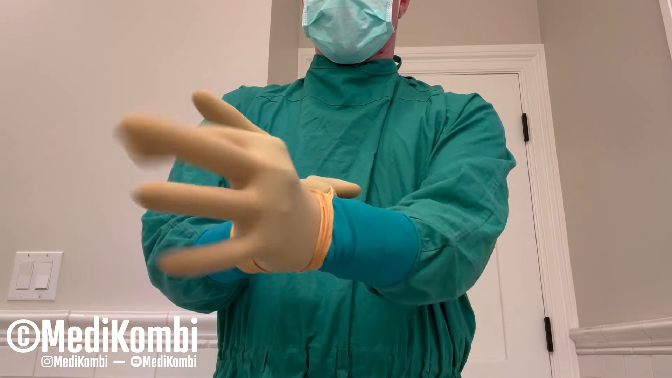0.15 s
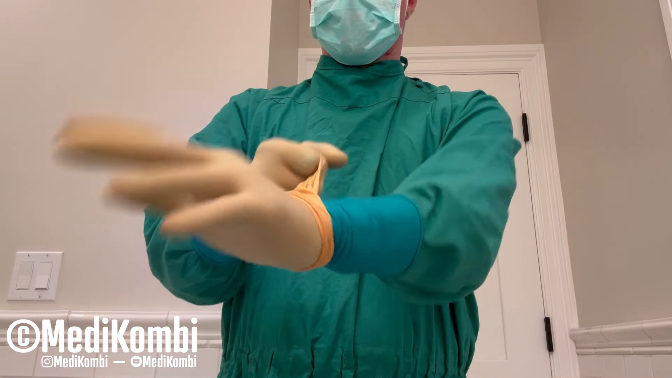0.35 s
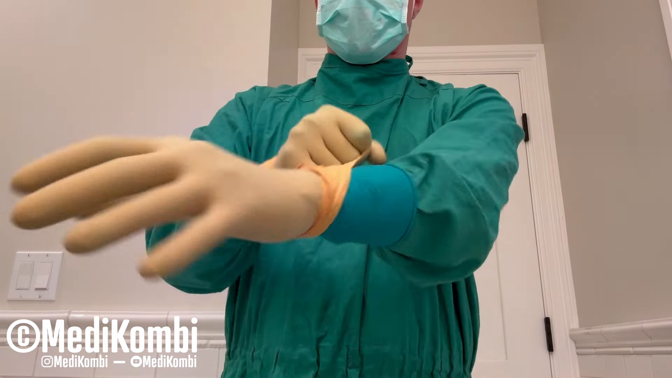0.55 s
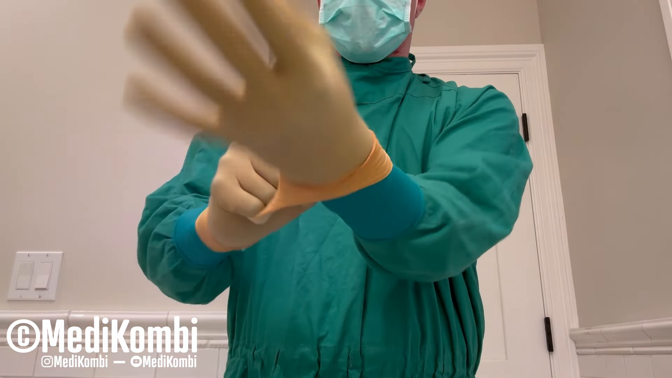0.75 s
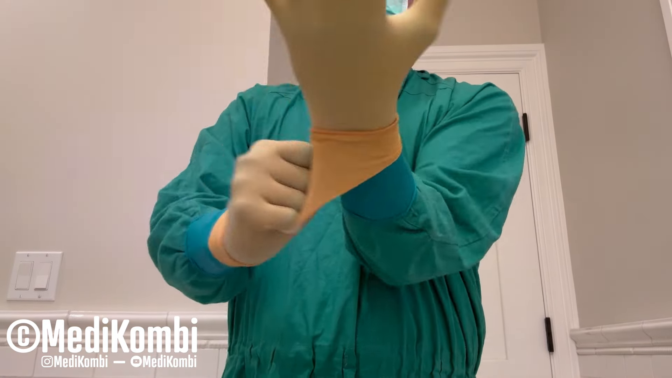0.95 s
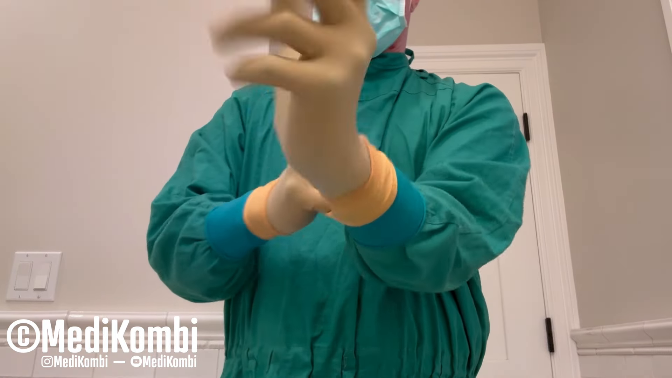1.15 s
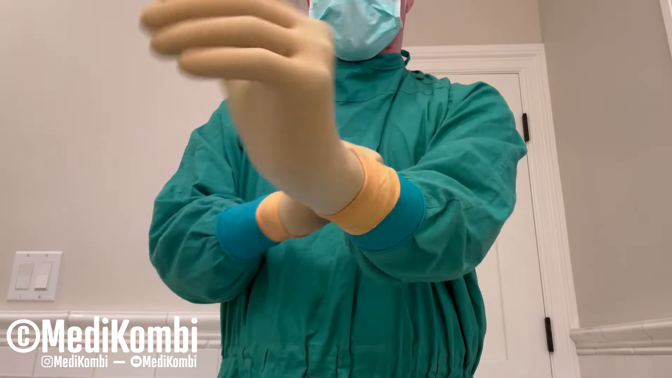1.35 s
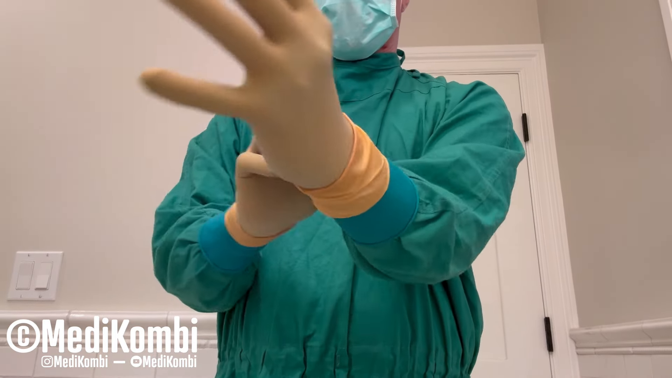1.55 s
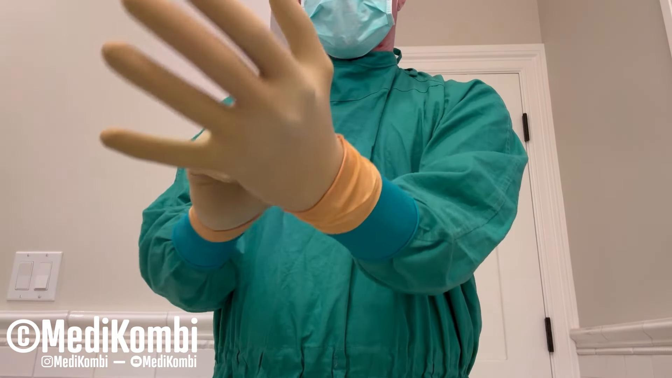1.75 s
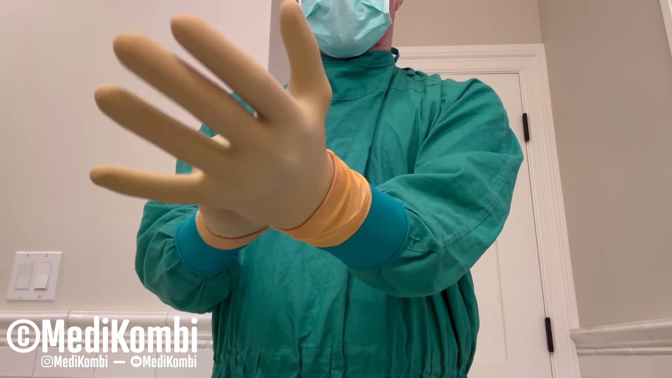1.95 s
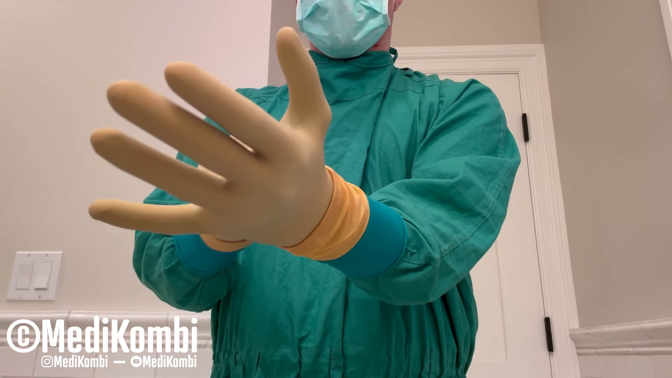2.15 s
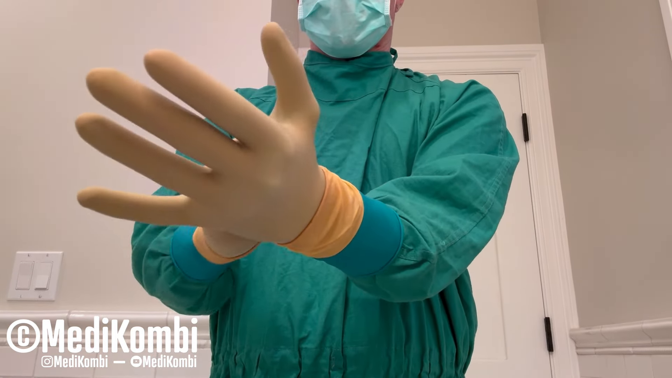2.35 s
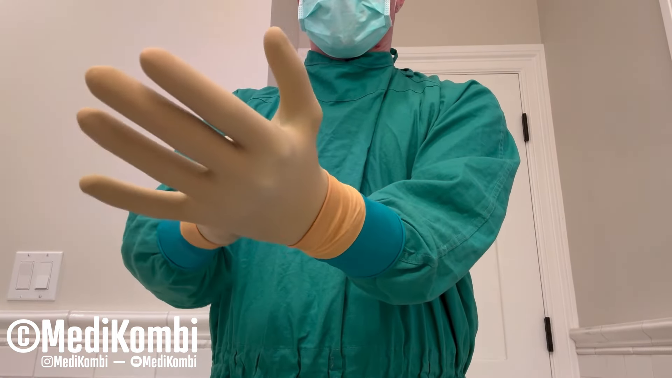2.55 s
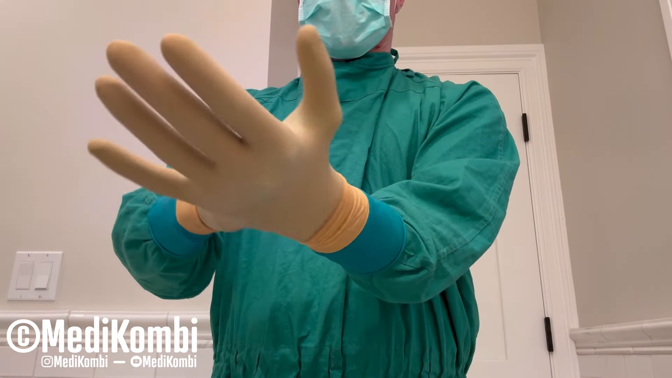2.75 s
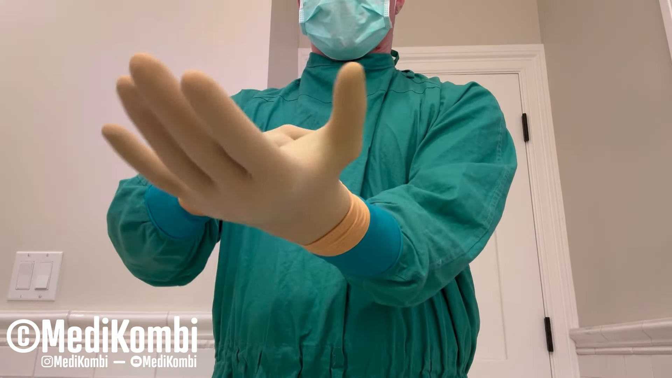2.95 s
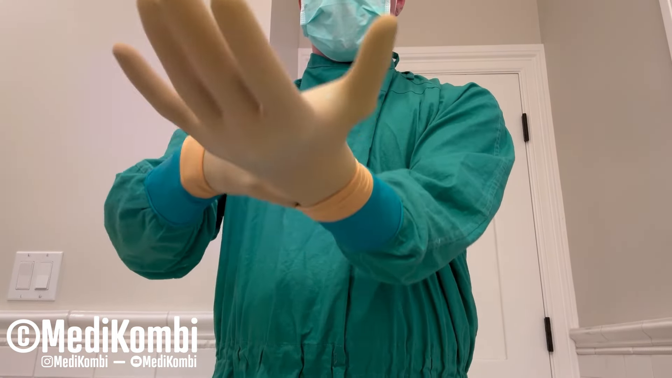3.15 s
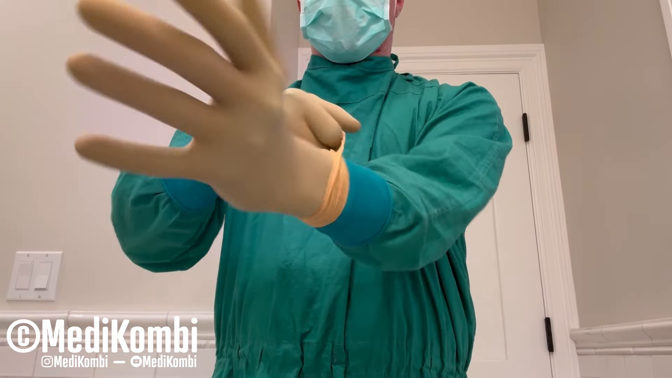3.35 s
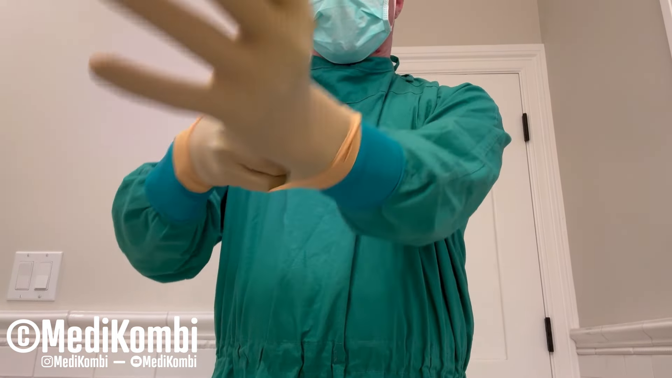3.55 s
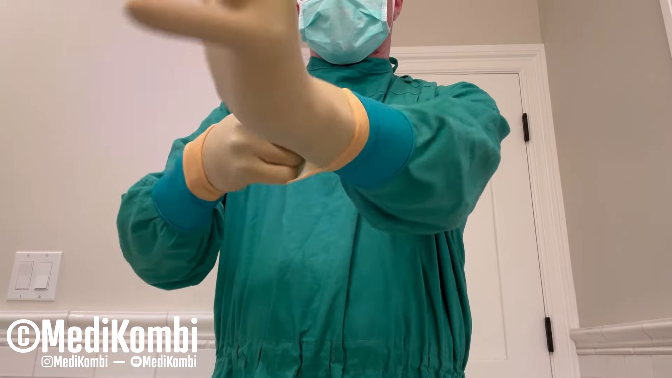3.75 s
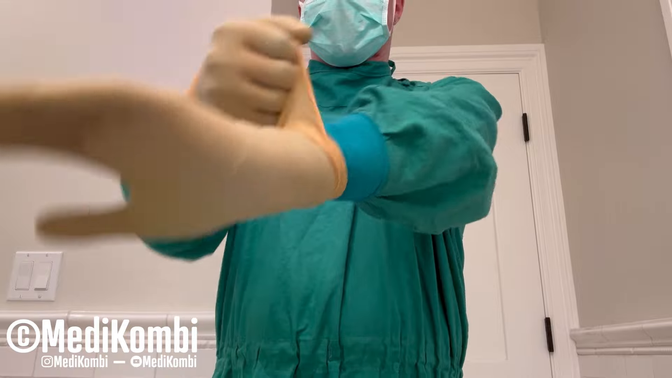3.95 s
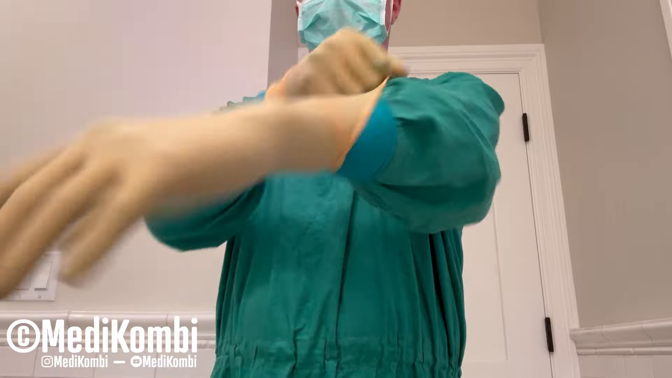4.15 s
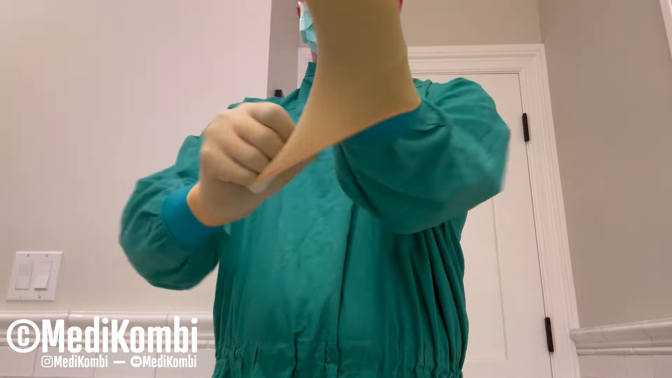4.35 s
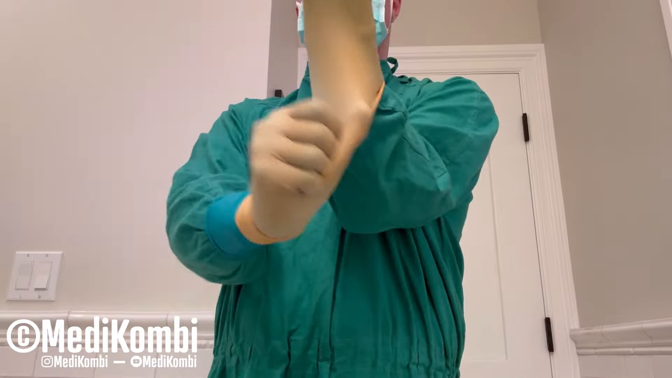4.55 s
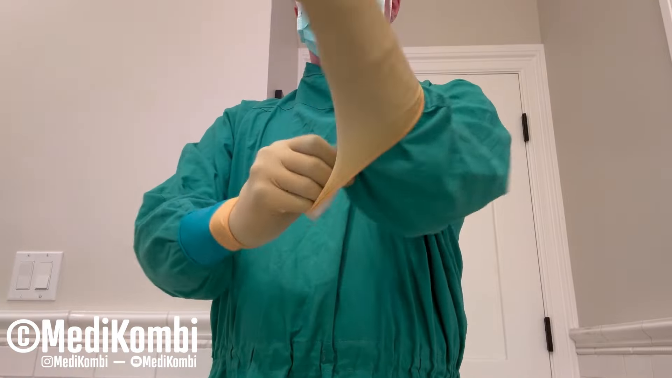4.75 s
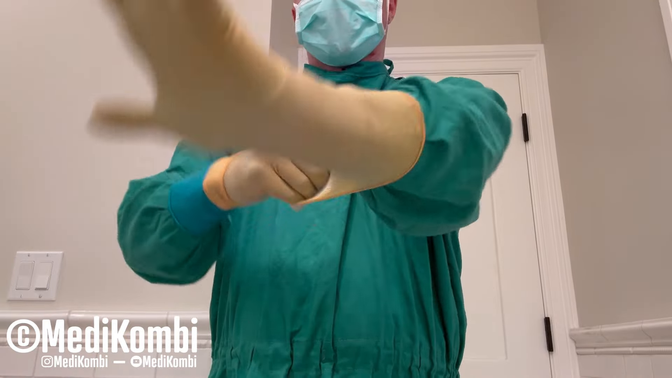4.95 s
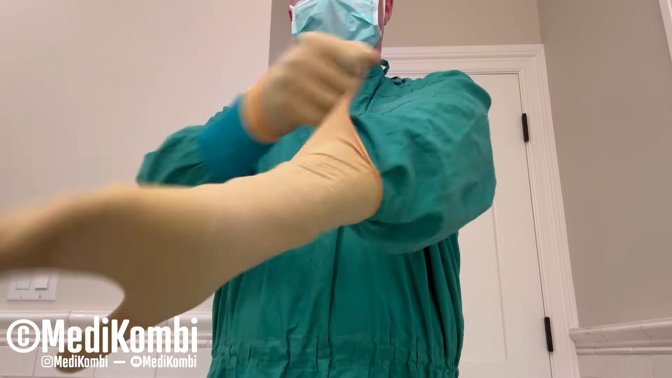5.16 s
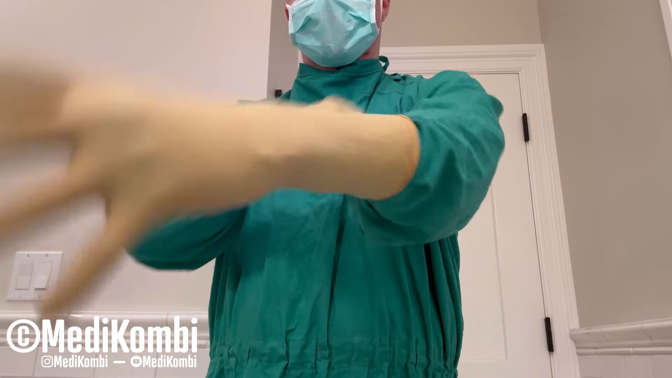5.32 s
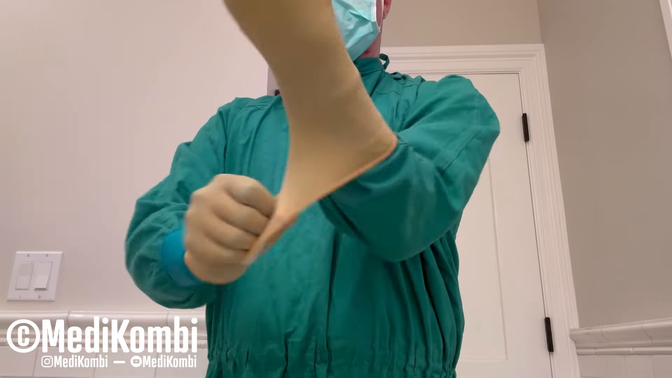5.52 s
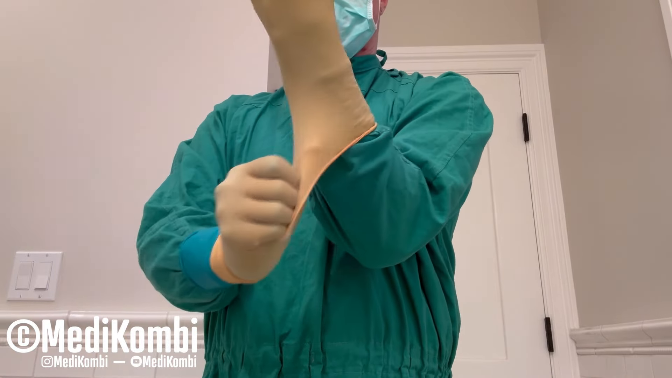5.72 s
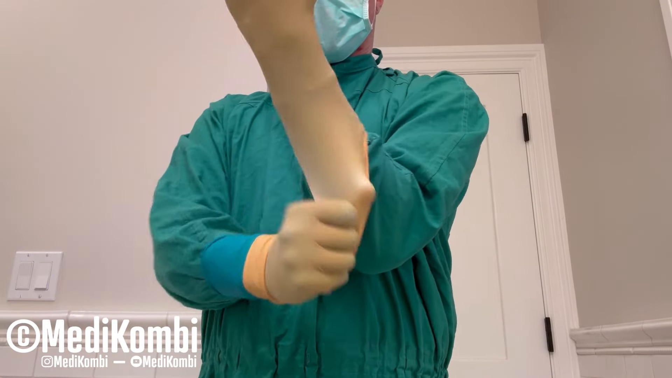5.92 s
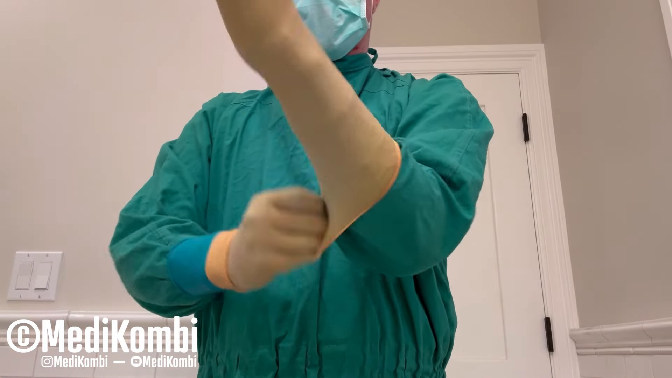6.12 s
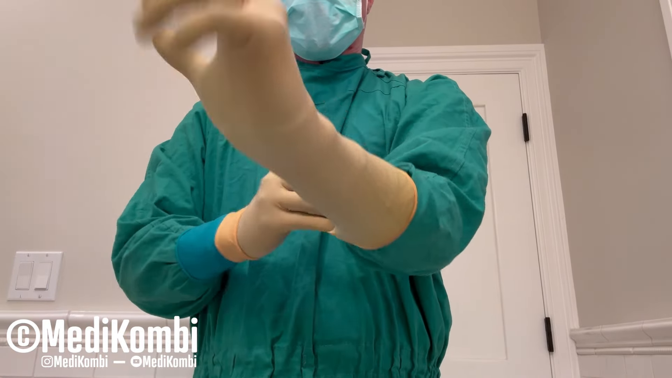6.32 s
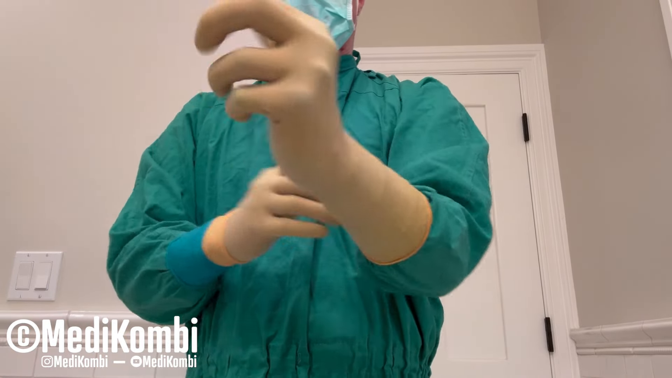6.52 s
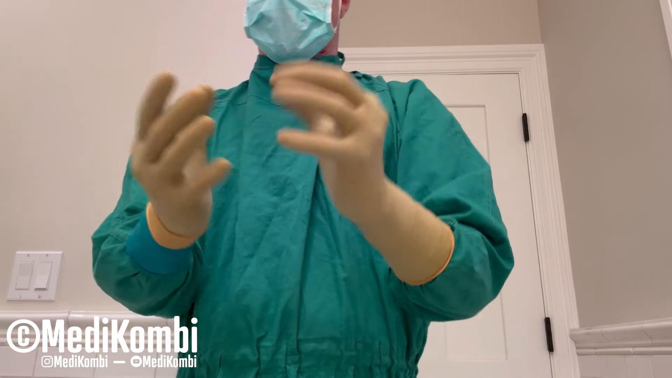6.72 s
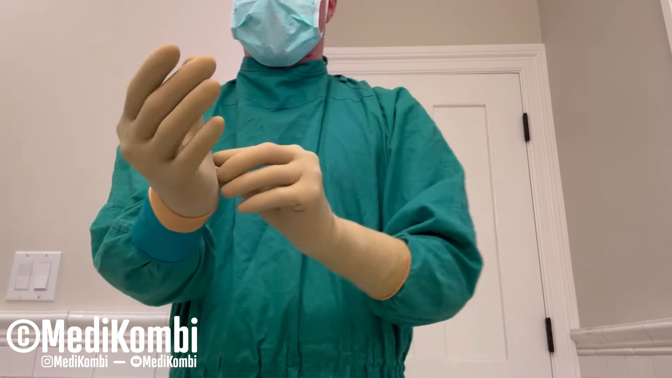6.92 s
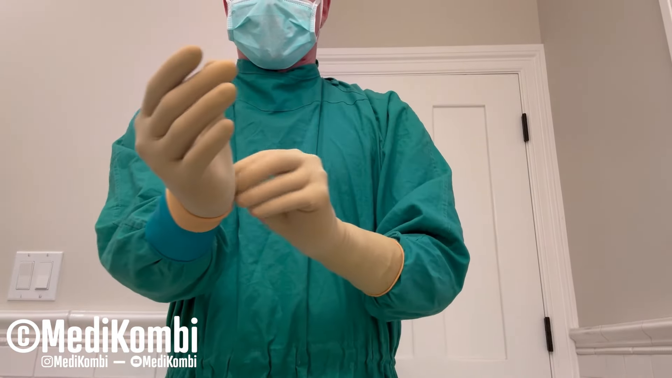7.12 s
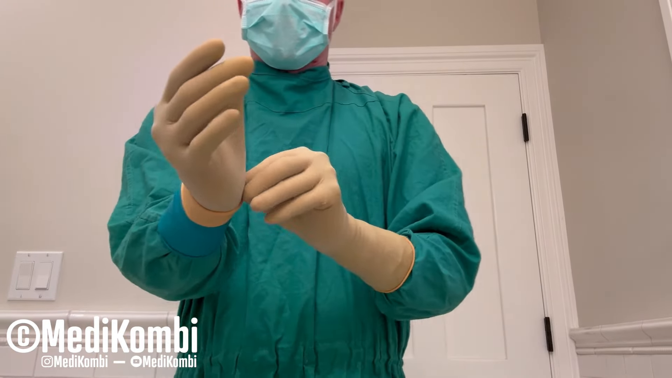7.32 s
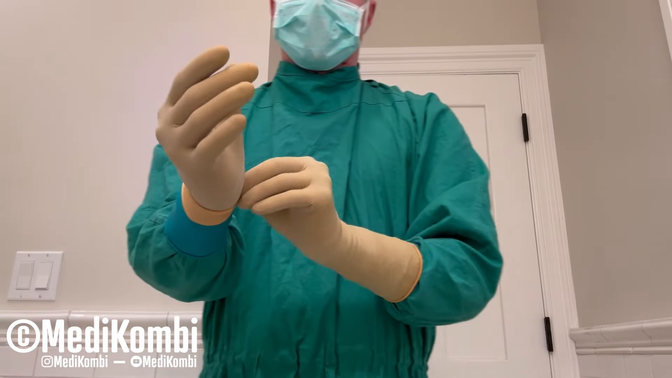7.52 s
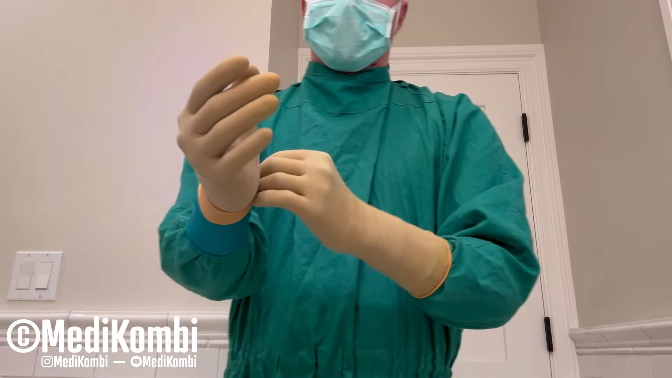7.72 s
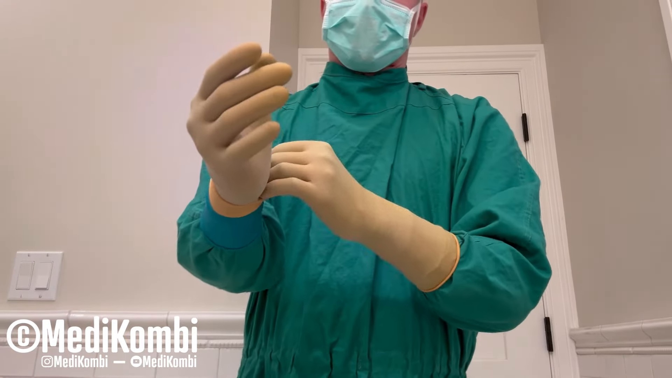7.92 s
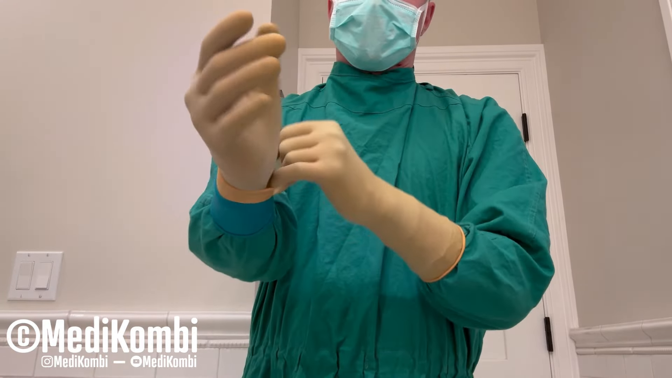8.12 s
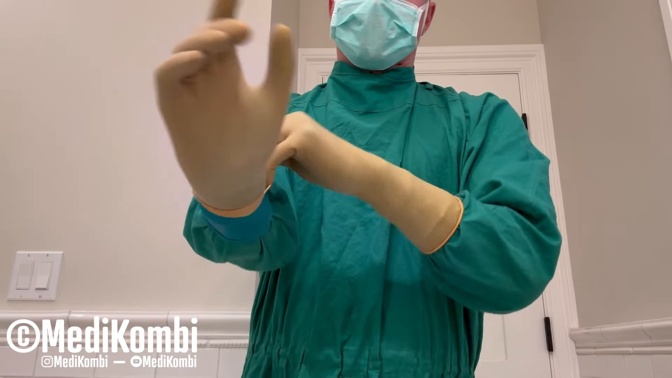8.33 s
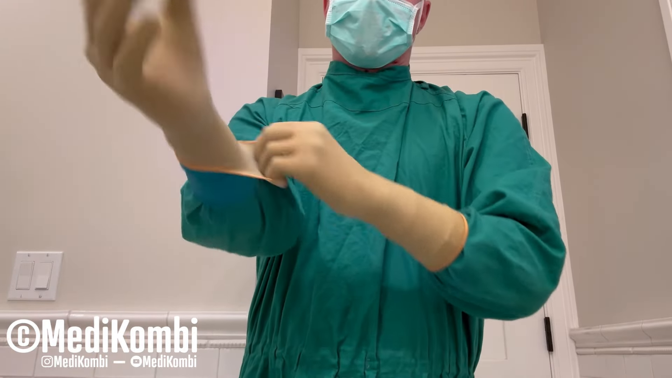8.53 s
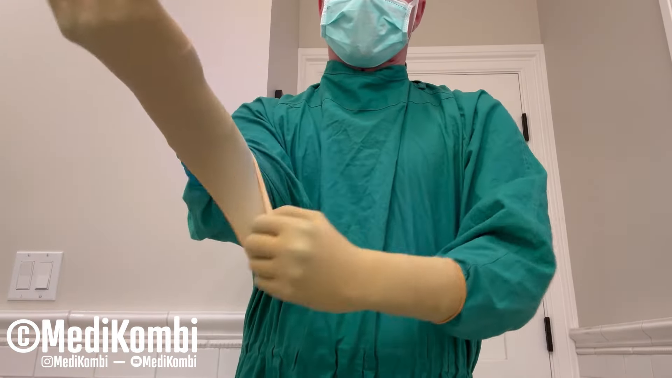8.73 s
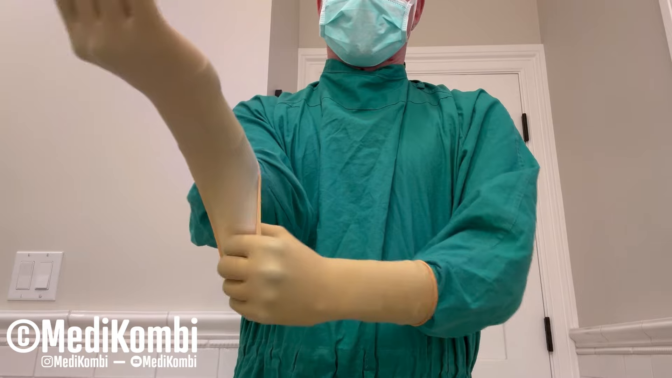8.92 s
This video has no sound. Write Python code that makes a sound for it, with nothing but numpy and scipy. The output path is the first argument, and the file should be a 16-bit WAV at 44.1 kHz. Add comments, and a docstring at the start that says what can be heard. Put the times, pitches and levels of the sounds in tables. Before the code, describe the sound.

Thick rubber gloves are tugged over fabric sleeves in a small, hard-walled room. Snaps and dry hissing strokes come quickly at first, then it calms to faint creeping. A cuff cracks brightly just after three seconds, followed by busy rubbing, flaps, squeaks and pops. Another quieter stretch leads to a squeak and deep airy thump near the end. Close stereo microphones catch short reverberation.

```python
"""Rubber slides and crinkles as thick gloves are pulled over gown sleeves in a small, hard-walled room.
It squeaks, flaps and snaps back; a released cuff cracks brightly, a later one thumps with trapped air.
Snaps and cracks are dispersed impulses, squeaks are stick-slip pulse trains, flaps are short decaying swings.
Sliding is shaped noise with random grains; the thump rings low room modes and the walls reverberate."""
import sys
import numpy as np
from scipy import signal
from scipy.fft import rfft, irfft, next_fast_len
from scipy.io import wavfile
from scipy.ndimage import uniform_filter1d

SR = 44100
rng = np.random.default_rng(int(sys.argv[2]) if len(sys.argv) > 2 else 0)


def output_pcm(signal):
    """Save a mono or channel-first signal as 16-bit PCM at the path in sys.argv[1].

    Samples are clipped to [-1, 1] before scaling.
    """
    pcm = np.clip(np.atleast_2d(signal).T, -1, 1) * 32767
    wavfile.write(sys.argv[1], SR, np.round(pcm).astype(np.int16))


N = 396018
TIME = np.arange(N) / SR
SHEET_SIZE = 2048  # samples in one response of the rubber
SHEET_LEAD_S = SHEET_SIZE / 2 / SR  # its centre lies this long after its start


def undb(db):
    """Level: decibels become an amplitude gain."""
    return 10 ** (np.asarray(db) / 20)


def along(hz, points):
    """Logarithmic frequency: interpolate (Hz, value) points on an octave-like axis."""
    f, value = np.transpose(points)
    return np.interp(np.log(np.maximum(hz, 1)), np.log(f), value)


def bins(size):
    """Discrete spectrum: the frequencies in Hz for a signal of that many samples."""
    return np.arange(size // 2 + 1) * SR / size


def unit(x):
    """Normalisation: scale to rms 1."""
    return x / np.sqrt(np.mean(x ** 2))


def colour(x, points):
    """Linear filtering: multiply the spectrum by a gain curve of (Hz, dB) points."""
    size = x.shape[-1]
    padded = next_fast_len(size + 2048, True)
    gain = undb(along(bins(padded), points))
    return irfft(rfft(x, padded) * gain, padded)[..., :size]


def walk(rate, size):
    """Random modulation: levels held for 1 / rate seconds, slewed, with rms near 1."""
    hold = max(int(SR / rate), 1)
    steps = np.repeat(rng.standard_normal(size // hold + 2), hold)
    return unit(uniform_filter1d(steps, hold))[:size]


def add(track, s, x):
    """Superposition: mix x into the track from time s on."""
    i = int(s * SR)
    track[..., i:i + x.shape[-1]] += x[..., :max(N - i, 0)]


def decay(t, t60):
    """Exponential decay: amplitude falls by 60 dB in t60 seconds."""
    return np.exp(-np.log(1000) * t / t60)


def sheet(points, lag_s=0.00099, bend_hz=2000, scatter_s=.00035):
    """Dispersion: mid and side response to one slip; treble runs ahead, wrinkles scatter the arrivals."""
    hz = bins(SHEET_SIZE)
    scatter = np.array([walk(1600, len(hz)) for _ in range(2)])
    delay = SHEET_LEAD_S + lag_s * (np.exp(-hz / bend_hz) - .3) + scatter_s * scatter
    # phase is the running sum of group delay over frequency
    phase = 2 * np.pi * np.cumsum(delay, axis=1) * SR / SHEET_SIZE
    return irfft(undb(along(hz, points)) * np.exp(-1j * phase))


def snap(points, slap_db=-1.0, peel_db=-11):
    """Impulsive release: a fold peels off over a few milliseconds, with one sharp slap in the middle."""
    slap = sheet(points, lag_s=0.00082, scatter_s=0.00033)
    peel = sheet(points, lag_s=.002, scatter_s=0.00207)
    return undb(slap_db) * slap + undb(peel_db) * peel


# Colour that all small snaps share. Each row: frequency in Hz, relative level in dB.
SNAP_COLOUR = [(90, -12), (400, -1.5), (2400, -1.5), (4200, 1), (8500, -1.5), (12000, 3.5), (16000, 1)]


def fold(db, centre_hz, fall_db, round_octaves=0.11):
    """Resonance: the (Hz, dB) spectrum of a snapping fold, a rounded hump on the colour of the rubber."""
    hz = np.geomspace(60, 17000, 40)
    octaves = np.hypot(np.log2(hz / centre_hz), round_octaves) - round_octaves
    return np.c_[hz, db - fall_db * octaves + along(hz, SNAP_COLOUR)]


# Small snaps of rubber; a taut fold rings higher, a clean release narrower.
# Each row: time in seconds, relative level in dB, centre in Hz, fall to each side in dB per octave,
# relative level sent into the room in dB.
SNAPS = [(.036, -11, 1520, 10, -3), (0.454, -10.5, 1660, 13, -2), (0.658, -2, 6840, 6, -10),
         (0.673, -13, 700, 4, -2.5), (0.7949, -7.5, 1000, 4, -7), (0.8346, -13, 1640, 6, 2),
         (.851, -8, 1400, 13, -2), (0.8605, -17, 1820, 0.5, -13), (.877, -11, 900, 8, -6),
         (0.979, 4, 1330, 13, -6.5), (1.077, -7, 1640, 6, 1), (1.87, -27, 1600, 12, -5),
         (2.216, -23, 1400, 5.5, 2), (2.2347, -14, 4400, 9, -1), (2.7352, -16, 1150, 4, 0.5),
         (3.0029, -18, 12000, -0.5, 1.5), (3.1646, -17, 6000, 4.5, -2.5), (3.1913, -8.5, 2180, 2.5, 2.5),
         (3.5, -16.5, 1100, 5, 6), (3.595, -20, 1400, 3.5, 4), (3.8726, -20, 3830, 8.5, 7.5),
         (4.0045, -15.5, 1400, 1.5, -1), (4.2956, -3, 12000, 1.5, -7.5), (4.318, 1, 3420, 6.5, -2.5),
         (4.329, -12, 1200, 13, -10), (4.3457, -5, 4000, 2, -7.5), (4.3975, -8, 398, -0.6, -10),
         (4.666, -2.5, 624, 9.5, -5.5), (4.703, -7, 1250, 9.5, 0.5), (4.9033, -19, 11750, 20, -18),
         (4.94, -18, 1580, 12.5, 2.5), (5.0319, -22, 11600, -0.8, -1), (5.0635, -8.5, 2750, 3, 4),
         (5.3273, -12.5, 790, 1.5, -7), (5.873, -16.5, 1000, 7, 5.5), (6.043, -14, 990, 20, -15),
         (6.2831, -7.5, 11040, 4, -2.5), (6.387, -11.5, 1495, 5.5, 0), (6.4709, -11, 2270, 3.5, 1),
         (7.45, -25, 1810, 11.5, -7), (7.678, -12.5, 3800, 1.5, 1), (7.839, -13, 1430, 22, -8),
         (7.95, -10, 880, 12, 0.5), (8.2504, -9.5, 2200, 8, -3.5), (8.378, -13.5, 3870, 13, -5),
         (8.8136, 4, 730, 17, -9.5)]


def snaps():
    """Elastic release: pinched folds slip free and slap back; returns direct sound and room feed."""
    near, far = np.zeros((2, N)), np.zeros(N)
    for s, db, centre_hz, fall_db, room_db in SNAPS:
        points = fold(db, centre_hz, fall_db)
        add(near, s - SHEET_LEAD_S, snap(points))
        add(far, s - SHEET_LEAD_S, sheet(points)[0] * undb(room_db))
    return near, far


TIGHT_S, LOOSE_S = 3.2226, 8.619  # release of the tight and the loose cuff, seconds
# Spectra of each cuff's crack and of what it throws into the room.
# Each row: frequency in Hz, relative level in dB.
TIGHT_CRACK = [(200, -24.5), (450, -8), (1000, 18.5), (1600, 11.5), (2600, -0.5), (4300, 18), (7500, -1),
               (14000, 2)]
TIGHT_RING = [(230, -26), (420, 5.5), (650, 8), (1000, 9), (1700, 3.5), (2400, -4), (3100, 12.5),
              (3750, 12), (4600, 18), (5700, 7.5), (7700, 4), (9500, -7.5), (14000, -5)]
LOOSE_CRACK = [(80, -24), (280, 12), (450, -9), (1000, 11), (2000, 14), (4300, 3), (14000, -8.5)]
LOOSE_RING = [(130, -11.5), (178, 23), (310, 22.5), (550, 17.5), (850, 7), (1100, 1.5), (2000, 11),
              (4000, -5), (7000, -7), (14000, -11)]
# Reflections of the crack from the nearest walls. Each row: lag in seconds, relative level in dB.
WALL_ECHOES = [(0.0181, -23), (0.0362, -18.5)]


def released_cuffs():
    """Stored strain energy: two stretched cuffs crack and echo; returns direct sound and room feed."""
    near, far = np.zeros((2, N)), np.zeros(N)
    for s, crack, ring in [(TIGHT_S, TIGHT_CRACK, TIGHT_RING), (LOOSE_S, LOOSE_CRACK, LOOSE_RING)]:
        start_s = s - SHEET_LEAD_S
        add(near, start_s, snap(crack, slap_db=-2, peel_db=-9.5))
        add(far, start_s, sheet(ring)[0])
        for lag_s, db in WALL_ECHOES:
            add(near, start_s + lag_s, undb(db) * sheet(crack))
    return near, far


# Low modes of the room. Each row: frequency in Hz, relative level in dB, 60 dB decay time in seconds.
BOOM = [(199, -31, 0.49), (232, -32, 0.61), (317.3, -34, 0.53), (431, -30, 0.42)]


def boom(rise_s=0.01):
    """Modal excitation: the thump of the loose cuff rings the room's low modes, which die exponentially."""
    out, t = np.zeros((2, N)), np.arange(SR // 2) / SR
    rise = 1 - np.exp(-t / rise_s)
    for hz, db, t60 in BOOM:
        ring = np.sin(2 * np.pi * (hz * t + rng.random((2, 1))))
        add(out, LOOSE_S, undb(db) * ring * decay(t, t60) * rise)
    return out


# Strokes of the glove along sleeve and arm; a fast one hisses, a firm one rubs.
# Each row: start in seconds, length in seconds, relative hiss level in dB, relative rub level in dB.
STROKES = [(-.05, 0.11, -53, -58.5), (0.096, 0.16, -55, -63), (0.285, 0.19, -50.5, -59.5),
           (0.478, 0.24, -53.5, -61), (0.62, 0.6, -55, -54), (0.98, 0.28, -54.5, -66),
           (1.29, 0.24, -51.5, -65.5), (1.584, 0.029, -54, -66), (2.262, 0.33, -61, -67),
           (2.542, 0.42, -63, -67), (3.037, 0.37, -59, -56), (3.433, 0.14, -58.5, -57.5),
           (3.794, 0.29, -49, -54.5), (4.085, 0.16, -46.5, -53.5), (4.262, 0.15, -48.5, -48.5),
           (4.466, 0.2, -62.5, -57), (4.637, 0.095, -51, -59.5), (4.77, 0.31, -61.5, -68.5),
           (5.124, 0.15, -47, -57.5), (5.273, 0.36, -51, -54), (5.784, 0.075, -55, -58.5),
           (5.88, 0.12, -59, -57), (5.986, 0.21, -50.5, -59.5), (6.216, 0.19, -49.5, -57),
           (6.959, 0.18, -66, -79.5), (7.366, 0.32, -63, -75), (7.85, 0.24, -57, -63.5),
           (8.101, 0.2, -55, -59.5), (8.3, 0.43, -51.5, -64), (8.59, 0.17, -51, -52.5),
           (8.887, 0.055, -54.5, -54.5)]
STROKE_ATTACK_SHARE, STROKE_SAG_DB_PER_S, STROKE_RELEASE_S = 0.41, 7.5, 0.072
RESTING_HISS_DB, RESTING_RUB_DB = -75.5, -85  # relative; the gloves never lie quite still


def strokes():
    """Power addition: each stroke gathers speed, sags and dies away; returns gains of hiss and rub."""
    power = undb([[RESTING_HISS_DB], [RESTING_RUB_DB]]) ** 2 * np.ones(N)
    for s, length, hiss_db, rub_db in STROKES:
        t = TIME[(TIME >= s) & (TIME < s + length + 6 * STROKE_RELEASE_S)] - s
        attack = np.minimum(t / (STROKE_ATTACK_SHARE * length), 1)
        sag = undb(-STROKE_SAG_DB_PER_S * t)
        release = np.exp(-np.maximum(t - length, 0) / STROKE_RELEASE_S)
        gain = undb([[hiss_db], [rub_db]]) * attack * sag * release
        add(power, max(s, 0), gain ** 2)
    return np.sqrt(power)


def crinkle(rate, spread_db, smooth, flicker_db):
    """Random impulse friction: tiny slips of unequal size over smooth noise, coming in spurts."""
    size_db = spread_db * np.minimum(rng.exponential(size=N), 4)
    slips = (rng.random(N) < rate / SR) * undb(size_db)  # rate: mean slips per second
    grains = unit(slips * rng.uniform(-1.06, 1, (2, N)))
    friction = smooth * rng.standard_normal((2, N))
    return (grains + friction) * undb(flicker_db * walk(45, N))


# Spectra of the hiss on cloth and the rub on the arm. Each row: frequency in Hz, relative level in dB.
HISS = [(700, -13.5), (2000, 1), (7000, -1.5), (10000, -4.5), (13000, 1.5), (16000, -5.5)]
RUB = [(50, -9), (130, -3), (260, -0.5), (800, 2), (1400, 0), (2200, -3), (4000, -20.5)]


def sliding(hiss_db=-0.5, rub_db=-2):
    """Sliding friction: the glove hisses over cloth and rubs dully on the arm; slack rubber smears rubs."""
    hiss, rub = strokes()
    bright = colour(crinkle(rate=1500, spread_db=-0.5, smooth=1.3, flicker_db=1.74), HISS)
    slips = crinkle(rate=380, spread_db=2.5, smooth=0.48, flicker_db=2.5)
    smear = sheet(RUB, lag_s=0.00409, scatter_s=0.000974)
    dull = signal.fftconvolve(slips, smear, "same", axes=1)
    return unit(bright) * hiss * undb(hiss_db) + unit(dull) * rub * undb(rub_db)


# Stick-slip squeaks, grunts and creaks. Each row: start in seconds, length in seconds,
# nominal first and last slip rate in Hz, relative level in dB, sharpness of a slip (1 round, 100 a tick).
SQUEAKS = [(.875, 0.068, 562, 513, -51.5, 1.7), (.975, 0.046, 748, 656, -49.5, 2.1),
           (3.525, 0.084, 221.3, 169.4, -56, 30), (4.119, 0.025, 588, 405, -50.5, 4),
           (4.17, 0.084, 280.4, 220.7, -49, 7.9), (4.295, .115, 200.5, 310.4, -50, 3.5),
           (4.4, 0.09, 189.8, 141.2, -53, 34), (5.22, 0.032, 1293, 634, -47.5, 2.3),
           (5.266, 0.057, 564, 483, -53.5, 1.1), (5.326, 0.025, 484, 424, -46, 0.8),
           (5.806, 0.037, 1260, 1078, -57, 0.73), (6.243, 0.091, 669, 590, -46.5, 38),
           (6.345, 0.05, 598, 670, -48.5, 55), (8.564, 0.03, 1234, 1340, -52, 0.59),
           (8.594, 0.036, 420, 277, -43, 2.6), (8.622, 0.047, 249, 193, -40.5, 3.7),
           (8.941, 0.075, 225, 223, -51, 2.7)]


def squeaks(jitter=0.111, rough_db=4.5, rasp=0.26, detune=.1):
    """Stick-slip: three neighbouring ridges slip at uneven rates, each slip a gritty push on the sheet."""
    out = np.zeros(N)
    push_colour = [(110, -37), (220, -11.0), (500, -5.5), (2200, -5.5), (8000, -6.0)]  # Hz, dB
    for s, length, first_hz, last_hz, db, sharp in SQUEAKS:
        size, slips = int(length * SR), 0
        uneven = np.clip(sharp / 12, .5, 1)  # round slips sing, sharp ones scrape
        for ridge in (-1, 0, 1):
            drift = np.exp(uneven * (detune * ridge + jitter * walk(600, size)))
            hz = np.linspace(first_hz, last_hz, size) * drift
            cycles = np.cumsum(hz) / SR + rng.random()
            push = np.exp(sharp * (np.cos(2 * np.pi * cycles) - 1))
            push = push * (1 + rasp * rng.standard_normal(size))
            roughness = undb(rough_db * walk(200, size))
            slips = slips + (push - push.mean()) * roughness / (1 + abs(ridge))
        slips = slips * signal.windows.tukey(size, .5)
        add(out, s, undb(db) * unit(colour(slips, push_colour)))
    return out


# Slack rubber flapping on the wrist; the last two rows are the low thump of the loose cuff. # Each row: time in
# seconds, pitch at that time in Hz, relative level in dB.
FLAPS = [(3.529, 460, -39), (3.642, 476, -46.5), (3.907, 440, -40), (4.021, 610, -43.5), (4.143, 454, -36),
         (4.182, 397, -27.5), (4.205, 524, -29), (4.279, 205, -40), (4.403, 340, -31.5), (4.553, 665, -41),
         (4.666, 330, -48.5), (5.332, 426, -39.5), (8.258, 380, -50.5), (8.6225, 816, -29),
         (8.6275, 274, -25)]


def flaps(rise_cycles=0.86, fall_cycles=1.3, slack=4, buzz=0.32):
    """Damped oscillation: a fold swings, buzzes in harmonics and sinks in pitch as it slackens."""
    out, t = np.zeros(N), np.arange(-SR // 50, SR // 25) / SR
    for s, hz, db in FLAPS:
        cycles = hz * t * (1 - slack * t)
        swell = np.exp(-np.where(t < 0, (cycles / rise_cycles) ** 2, cycles / fall_cycles))
        swing = swell * np.exp(2j * np.pi * (cycles + rng.random()))
        harmonics = swing + buzz * swing ** 2 + buzz ** 2 * swing ** 3
        add(out, s + t[0], undb(db) * np.real(harmonics))
    return out


# A thin whistle as the rubber creeps.
# Each row: time in seconds, nominal pitch in Hz, relative level in dB.
WHISTLE = [(1.6, 13400, -90), (1.72, 13800, -61.5), (1.859, 11500, -68), (2.051, 12100, -65.5),
           (2.2, 10600, -72), (2.25, 10700, -100)]


def whistle(waver=0.027):
    """Frequency modulation: very fast, unsteady stick-slip, heard as one wavering sine."""
    s, hz, db = np.transpose(WHISTLE)
    pitch = np.interp(TIME, s, hz) * (1 + waver * walk(2500, N))
    gain = np.interp(TIME, s, undb(db), left=0, right=0)
    return np.sin(2 * np.pi * np.cumsum(pitch) / SR) * gain


# Reverberation. Each row: frequency in Hz, 60 dB decay time in seconds.
ROOM = [(120, 0.13), (400, 0.67), (1000, 0.48), (2200, 0.35), (4500, 0.49), (8000, 0.37)]


def room(x, gap_s=0.00052, build_s=0.0015, echo_db=1.0):
    """Reverberation: uneven echoes smooth into a mid and side tail that decays at its own rate per band."""
    t = np.arange(SR * 3 // 4) / SR
    unevenness = undb(echo_db * walk(900, len(t)) * np.exp(-t / 0.39))
    noise = rng.standard_normal((2, len(t))) * unevenness
    spectrum, centres = rfft(noise, len(t)), 62.5 * 2 ** np.arange(9)  # octave bands, Hz
    build = 1 - np.exp(-np.maximum(t - gap_s, 0) / build_s)
    tail = 0
    for hz, share in zip(centres, np.eye(len(centres))):
        band = irfft(spectrum * along(bins(len(t)), np.c_[centres, share]), len(t))
        fade = decay(t, along(hz, ROOM)) * build
        tail = tail + band * fade / np.sqrt(np.sum(fade ** 2 * noise ** 2) / 2)
    return signal.fftconvolve(x[None], tail, axes=1)[:, :N]


# Spectrum of the still room. Each row: frequency in Hz, relative level in dB.
AIR = [(25, -19), (60, 3), (120, 0.5), (200, -6.5), (500, -5), (1500, -17), (5000, -13), (15000, -18)]
AIR_DB = -75  # relative level


def still_air():
    """Background noise: steady random noise with the spectrum of the still room."""
    return undb(AIR_DB) * unit(colour(rng.standard_normal((2, N)), AIR))


# The two microphone ports.
# Each row: frequency in Hz, likeness from 0 to 1, phase in radians by which left leads.
PORTS = [(60.5, .65, 1), (249.4, 0.6, 0), (575, 0.01, 1.18), (1140, 0.3, 0.06), (1888, 0.3, -1.46),
         (3840, 0, -1.5), (5500, 0.1, -3.5), (8070, 0.6, 1.2), (8280, 1, 1.5), (11940, 1, 6.5),
         (14700, 0.97, 8.5)]


def ports(pair):
    """Interaural-style coherence: mid and side become two ports with set likeness and phase lead."""
    table, hz = np.array(PORTS), bins(N)
    alike = np.clip(along(hz, table[:, :2]), 0, 1)
    turn = np.exp(.5j * np.interp(hz, table[:, 0], table[:, 2]))  # half the lead to each port
    mid, side = rfft(pair) * np.sqrt([(1 + alike) / 2, (1 - alike) / 2])
    return irfft(np.array([(mid + side) * turn, (mid - side) / turn]), N)


def scene(slide_room_db=-8, fold_room_db=-4, balance_db=-1.25):
    """Superposition: direct sound of both gloves plus its reverberation, heard at two ports."""
    snap_near, snap_far = snaps()
    cuff_near, cuff_far = released_cuffs()
    slide, folds = sliding(), flaps() + squeaks()
    room_feed = snap_far + cuff_far + undb(slide_room_db) * slide[0] + undb(fold_room_db) * folds
    pair = snap_near + cuff_near + slide + boom() + still_air() + room(room_feed)
    pair[0] += folds + whistle()  # mid only
    balance = undb(np.array([[balance_db], [-balance_db]]) / 2)  # left, right
    return ports(pair) * balance


def record(dry, top_hz=16200):
    """Band limitation: a steep elliptic low-pass removes the extreme treble."""
    return signal.sosfilt(signal.ellip(10, .2, 80, top_hz, fs=SR, output="sos"), dry)


dry = scene()
out = record(dry)
output_pcm(out)
```